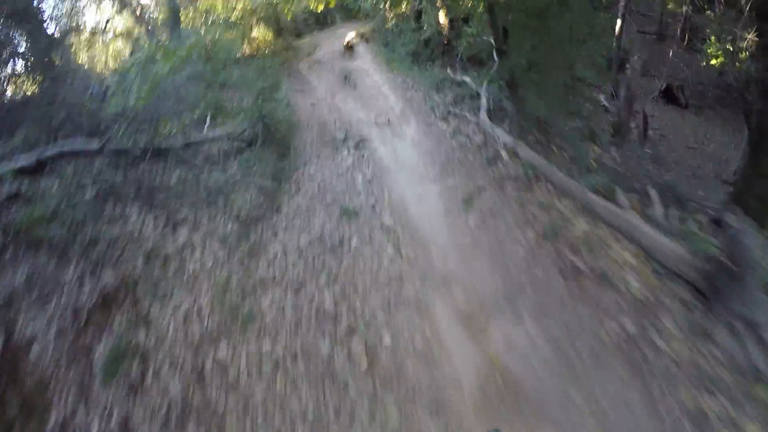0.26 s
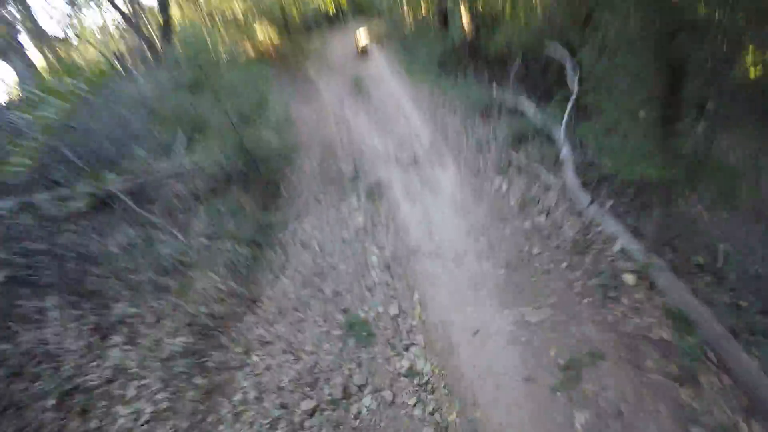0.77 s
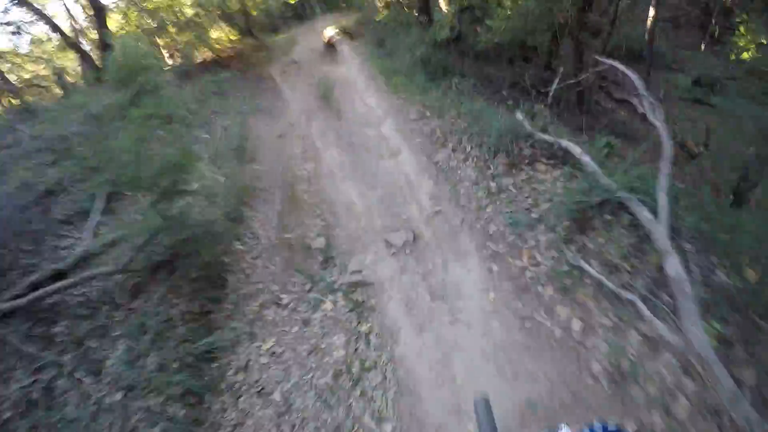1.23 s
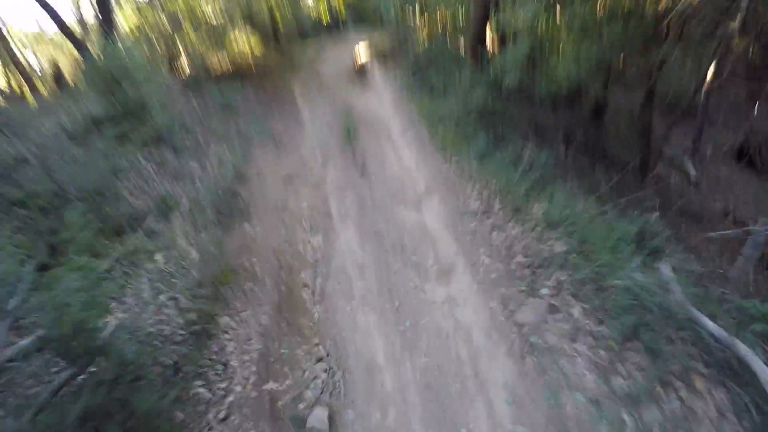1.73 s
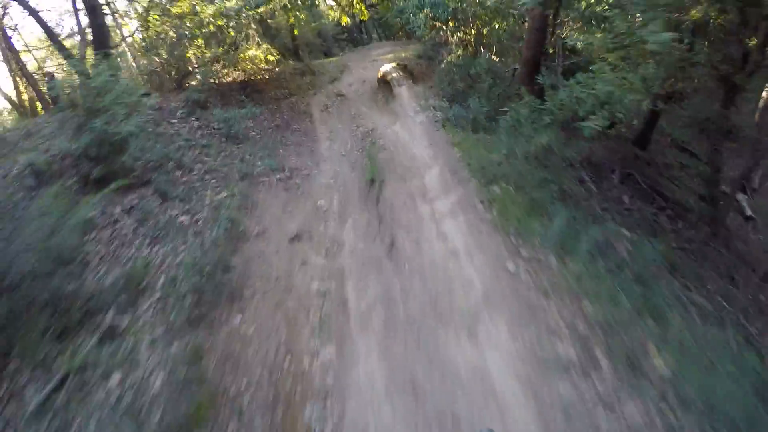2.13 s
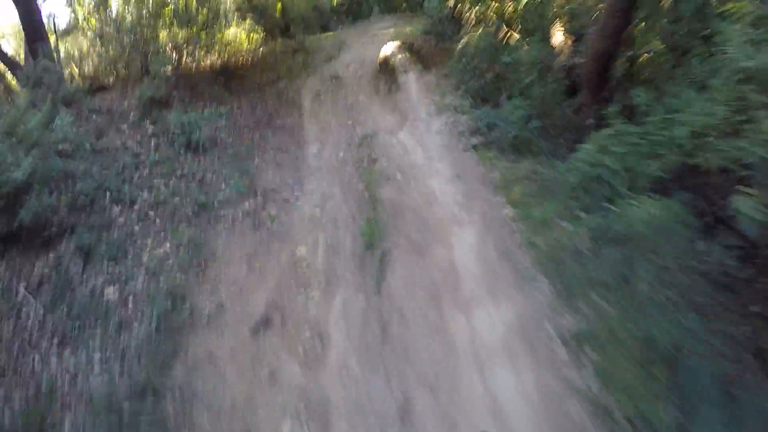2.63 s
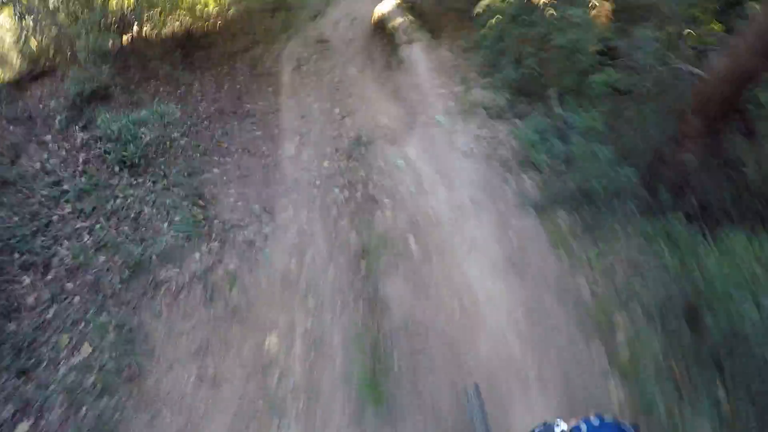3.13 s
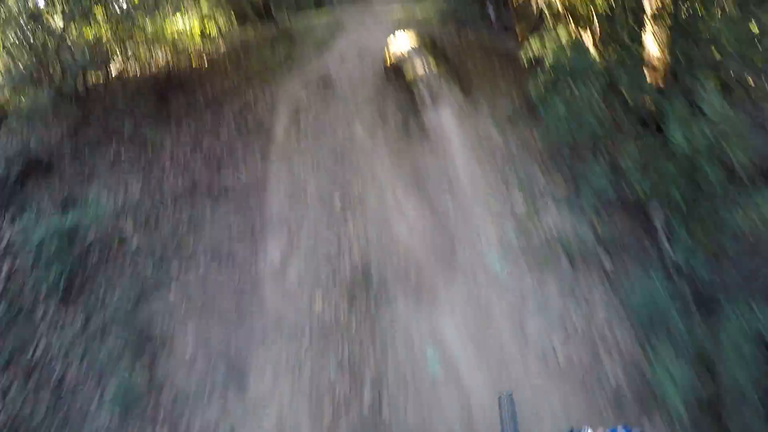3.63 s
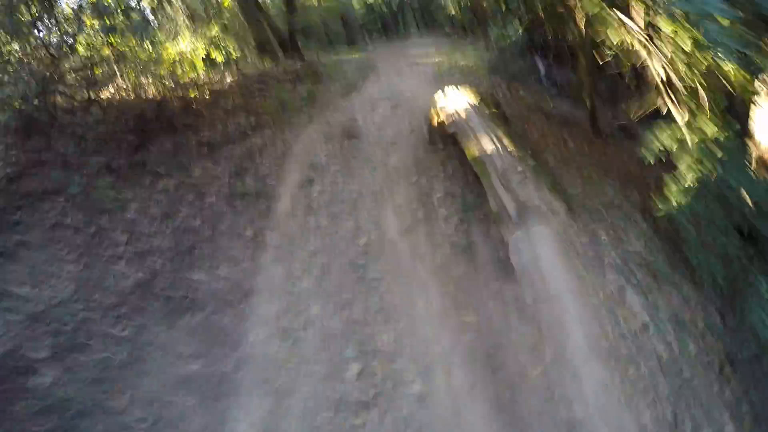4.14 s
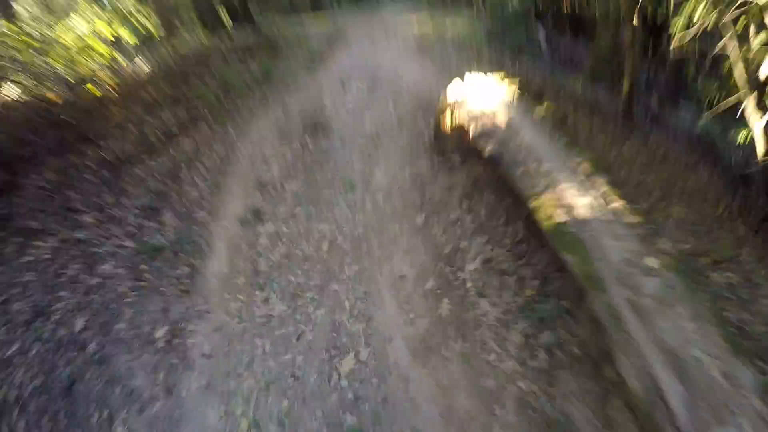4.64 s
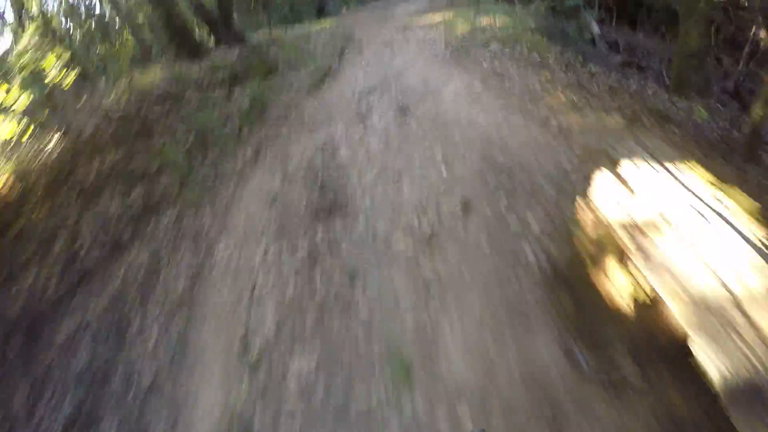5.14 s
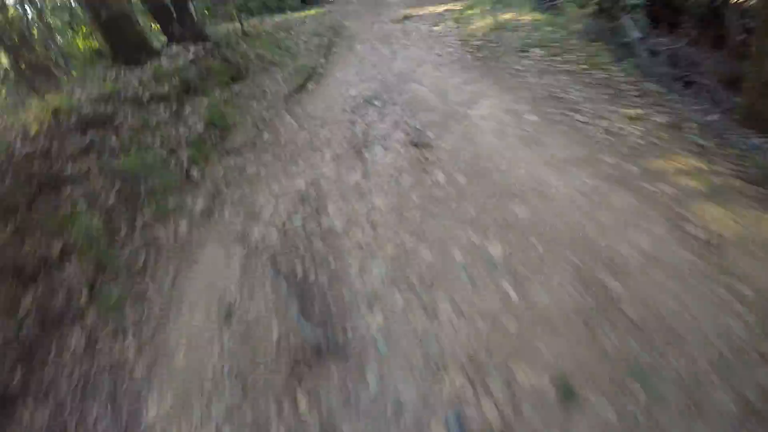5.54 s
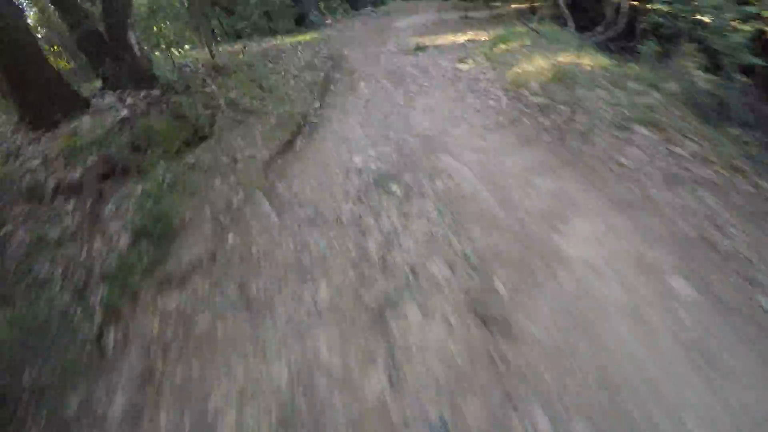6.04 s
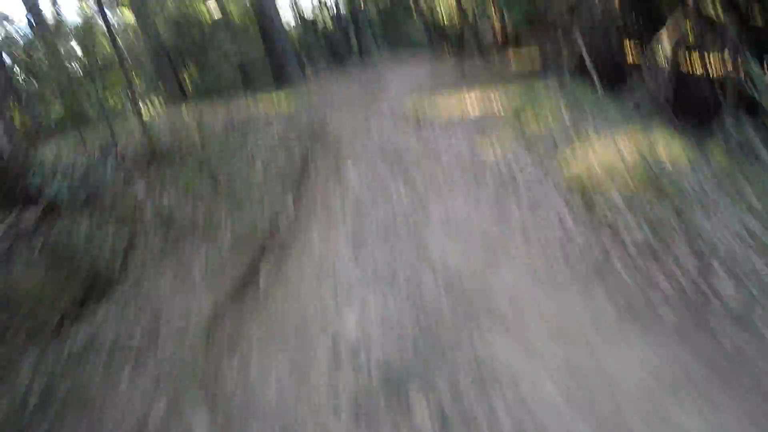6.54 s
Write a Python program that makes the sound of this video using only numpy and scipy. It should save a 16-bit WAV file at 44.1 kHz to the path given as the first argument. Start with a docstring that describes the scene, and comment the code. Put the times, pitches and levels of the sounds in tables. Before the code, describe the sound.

A mountain bike runs fast down a dirt forest trail, captured by a cased camera on the rider. Faint gritty rolling runs throughout, broken by short scuffs of tyres on earth and dry leaves. Chain and cables slap the frame irregularly, with hard clacks near 0.5, 4.2 and 4.4 seconds and a sharp one at 6.7. Low air buffets and tyre drumming pulse underneath. Bumps boom deeply around 1.6 and 2.4 seconds, then near 3.0 and 3.2. Tiny stone ticks come at 2.1 and 2.7. Between about 3.3 and 4.1 it is somewhat calmer, before a strong double jolt and crunch at 4.2. The heaviest, hollow thump lands at 5.1, followed by another at 5.5 amid stronger wind. Further bumps follow at 6.0 and 6.4, and a last loud clatter near 6.7. A thin hiss follows the rumble, with a very faint high electronic whine.

```python
"""A mountain bike runs fast down a dirt forest trail, heard from a camera on the rider. The tyres crunch dirt
and dry leaves; short scuffs surge with crunch and rub: spiky noise, coloured by the camera case. Chain and
cables slap the frame, and two flicked stones tick: short bursts of damped modes. Air buffets and tyres drum as
low noise; bumps boom as decaying sines, and a thin hiss follows the rumble. The camera rocks after each scuff
in slow pulses; its electronics whine in faint sine tones."""
import sys
import numpy as np
from scipy import signal
from scipy.fft import rfft, irfft, next_fast_len
from scipy.io import wavfile
from scipy.ndimage import uniform_filter1d, map_coordinates

SR = 44100
rng = np.random.default_rng(int(sys.argv[2]) if len(sys.argv) > 2 else 0)


def digitize_waveform(pressure):
    """Quantize a signal to 16-bit integers and store it at the path in sys.argv[1].

    Rows of a 2-D input are taken as channels; values are limited to [-1, 1].
    """
    field = np.atleast_2d(pressure).T
    bounded = np.clip(field, -1, 1)
    quanta = np.round(bounded * 32767).astype(np.int16)
    wavfile.write(sys.argv[1], SR, quanta)


N = 299421

# surges of crunch and rub: # (crest time [s], crunch level [dB], half-length [s], drumming level [dB])
SCUFF_EVENTS = [(0.081, -28.5, 0.012, -30.5), (0.175, -34.5, 0.035, -27.5), (0.31, -49, 0.021, -39),
                (0.572, -43.5, 0.052, -31.5), (0.737, -38, 0.013, -31.5), (0.942, -38, 0.014, -34.5),
                (1.051, -38, 0.016, -34.5), (1.187, -36.5, 0.012, -28.5), (1.244, -43.5, 0.022, -38),
                (1.319, -33.5, 0.011, -28.5), (1.377, -37.5, 0.017, -48), (1.582, -41, 0.032, -27.5),
                (1.659, -32.5, 0.015, -36), (1.782, -34, 0.018, -25.5), (1.929, -43, 0.014, -37),
                (2.121, -44.5, 0.028, -40.5), (2.33, -37, 0.0081, -28.5), (2.365, -32, 0.011, -16.5),
                (2.41, -42.5, 0.022, -47), (2.622, -36, 0.017, -28), (2.67, -25.5, 0.013, -22),
                (2.735, -37, 0.017, -44), (2.802, -46.5, 0.017, -50), (2.95, -41, 0.03, -33),
                (2.998, -31.5, 0.012, -32), (3.042, -40, 0.008, -37), (3.087, -43, 0.012, -44),
                (3.166, -31.5, 0.014, -19.5), (3.207, -37, 0.015, -34), (3.319, -38, 0.032, -46),
                (3.424, -37, 0.023, -27), (3.514, -36, 0.018, -38), (3.627, -40, 0.021, -27),
                (3.7, -38.5, 0.012, -32.5), (4.196, -28, 0.013, -19.5), (4.244, -23, 0.012, -21),
                (4.293, -36.5, 0.044, -48), (4.447, -38, 0.06, -37), (4.583, -38, 0.007, -32),
                (4.705, -35, 0.015, -33.5), (4.785, -42, 0.032, -38), (5.004, -34, 0.013, -30.5),
                (5.057, -29, 0.013, -24), (5.106, -33.5, 0.017, -24.5), (5.207, -39.5, 0.015, -38),
                (5.252, -38, 0.0094, -29), (5.453, -36, 0.016, -31.5), (5.508, -25.5, 0.011, -21),
                (5.556, -28.5, 0.014, -23.5), (5.74, -35.5, 0.011, -31), (5.787, -43.5, 0.032, -31.5),
                (5.919, -38, 0.0061, -25), (6.054, -38, 0.012, -27.5), (6.185, -39.5, 0.012, -33.5),
                (6.285, -43, 0.023, -44), (6.368, -33, 0.012, -31), (6.409, -35.5, 0.014, -22.5),
                (6.626, -29, 0.021, -30), (6.675, -23, 0.011, -18.5), (6.716, -35.5, 0.012, -31)]
# chain and cables on the frame: (time [s], level [dB], hollow knock re level [dB])
SLAP_EVENTS = [(0.0568, -16, -23), (0.2688, -26, -22), (0.5145, -10.5, -26.5), (0.619, -17.5, -29),
               (0.694, -25.5, -19.5), (0.922, -27.5, -25), (1.1515, -25, -18.5), (1.272, -18.5, -30),
               (1.378, -29, -24), (1.4177, -29, -19), (1.842, -21.5, -30), (2.1127, -25, -28),
               (2.3052, -22, -29), (2.5438, -33.5, -16.5), (2.6217, -21, -19.5), (2.7436, -21, -34),
               (2.8588, -20, -23), (2.8993, -27, -28), (3.1446, -20, -23), (3.275, -18, -34),
               (3.5022, -20, -34), (3.5955, -25.5, -21), (3.9237, -30, -17.5), (4.041, -22.5, -21),
               (4.1815, -11, -25.5), (4.4207, -14.5, -42), (4.4397, -20.5, -18.5), (4.959, -21, -24.5),
               (5.1065, -14.5, -8.5), (5.3395, -24.5, -26), (5.4864, -24, -28), (5.633, -22, -25),
               (5.7058, -22.5, -21), (5.9, -30, -18), (6.0382, -19.5, -24.5), (6.554, -23, -23.5),
               (6.622, -15.5, -22), (6.6761, -7, -32)]
# crunch as it sounds through the case: (frequency [Hz], density [dB per Hz])
CRUNCH_SPECTRUM = [(200, -14), (340, -24.5), (420, -9.5), (490, -14), (560, -17), (620, -13.5), (860, -17),
                   (1200, 0), (2000, -2), (3500, -9.5), (4400, -14), (4800, -16.5), (5700, -19.5),
                   (6500, -32.5), (9500, -31.5), (15500, -40.5)]


def amp(db):
    """Decibels to gain."""
    return 10 ** (np.asarray(db) / 20)


def unit(x):
    """Scale to rms 1."""
    return x / np.sqrt(np.mean(x ** 2) + 1e-20)


def along(points, hz):
    """Interpolate (Hz, value) points on a log frequency axis."""
    f, v = np.transpose(points)
    return np.interp(np.log(hz + 1), np.log(f + 1), v)


def curves(rows):
    """One value per sample for each column after the time."""
    s, *cols = np.transpose(rows)
    return [np.interp(np.arange(N) / SR, s, c) for c in cols]


def wobble(rate):
    """A smooth random curve, rate knots a second."""
    knots = rng.standard_normal(N // 20)
    return map_coordinates(knots, [np.arange(N) * rate / SR], mode="wrap")


def swells(rows):
    """Gain of bell-shaped swells (s, dB, half-length s), summed in power."""
    t = np.arange(N) / SR
    power = sum(amp(2 * db) * np.exp(-((t - s) / length) ** 2) for s, db, length in rows)
    return np.sqrt(power + 1e-20)


def filtered(x, response):
    """x times a response of frequency."""
    m = next_fast_len(N + SR // 2)
    return irfft(rfft(x, m) * response(np.fft.rfftfreq(m, 1 / SR)), m)[:N]


def coloured(x, gain_db):
    """Causal minimum-phase colouring by a dB function of frequency, at rms 1."""
    size = 8192
    cepstrum = irfft(np.log(amp(gain_db(np.fft.rfftfreq(size, 1 / SR)))))
    # fold the cepstrum onto positive time
    cepstrum[1:size // 2] *= 2
    cepstrum[size // 2 + 1:] = 0
    impulse = irfft(np.exp(rfft(cepstrum)))
    return unit(signal.fftconvolve(x, impulse)[:N])


def rumble(spectrum, steady_s):
    """Low noise whose rms stays near 1 over spans of steady_s."""
    x = filtered(rng.standard_normal(N), lambda hz: amp(along(spectrum, hz)))
    envelope = np.abs(signal.hilbert(x))
    power = uniform_filter1d(envelope ** 2, max(int(steady_s * SR), 1)) / 2
    return x / np.sqrt(np.abs(power) + 1e-20)


def ring(modes, t, attack_s):
    """Damped modes (Hz, dB, t60 s) at new strengths for each blow, peak 1."""
    hz, db, t60_s = np.transpose(modes)[:, :, None]
    size, detune, phase = rng.standard_normal((3, len(modes), 1))
    swing = amp(1.5 * size) * np.sin(2 * np.pi * hz * (1 + 0.012 * detune) * t + 1.2 * phase)
    attack = 1 - np.exp(-(t / attack_s) ** 2)
    x = (amp(db - 60 * t / t60_s) * swing).sum(0) * attack
    return x / np.abs(x).max()


def add(track, s, x):
    """Mix x into the track at time s."""
    part = track[max(round(s * SR), 0):][:len(x)]
    part += x[:len(part)]


def grit(spread_db):
    """White noise with a random level at every sample: thousands of tiny uneven snaps."""
    return rng.standard_normal(N) * amp(spread_db * rng.standard_normal(N))


def crunch():
    """Grit and leaves break in thousands of tiny snaps; surges of crunch and rub come at every scuff."""
    # steady rolling over dirt: (time [s], level [dB])
    rolling_levels = [(0, -44), (0.33, -47.5), (0.68, -53.5), (0.83, -43.5), (1.0, -54), (1.6, -50.5),
                      (1.88, -53), (2.2, -54), (2.55, -56), (3.05, -49.5), (3.4, -50.5), (4.1, -53.5),
                      (4.35, -43.5), (4.87, -53.5), (5.35, -50), (5.65, -46.5), (5.95, -49.5),
                      (6.79, -50.5)]
    # narrow resonances of the case: (frequency [Hz], width [Hz], gain [dB])
    case_resonances = [(1225, 30, 2), (1812, 12, -16), (1925, 100, 0.5), (2417, 46, -21.5), (2515, 190, 3),
                       (2850, 138, 6.5), (4188, 92, 9), (7300, 1860, 10), (11400, 900, 4.5)]
    light_tilt = [(300, 5.4), (900, 1.9), (4000, 1.2), (5700, 2.2), (8000, 0.54), (15000, 4)]
    crackle_spectrum = [(2000, -33), (4200, 2.5), (5300, -3.0), (6500, -10), (7500, 6.0),
                        (8300, 7), (9300, -23), (11500, -7.0), (15000, -23)]
    uneven_db, uneven_rate_hz = 2, 16

    def case_db(hz):
        peaks = sum(db / (1 + (2 * (hz - f) / width) ** 2) for f, width, db in case_resonances)
        return along(CRUNCH_SPECTRUM, hz) + peaks

    # light rolling is duller than a scuff
    light = coloured(grit(spread_db=6.5), lambda hz: case_db(hz) + along(light_tilt, hz))
    rolling = amp(curves(rolling_levels)[0] + uneven_db * wobble(rate=uneven_rate_hz)) * light

    surge = swells([row[:3] for row in SCUFF_EVENTS])
    scuffing = amp(-0.02) * surge * coloured(grit(spread_db=6), case_db)

    # the hardest scuffs add a sharp crackle
    sharp = coloured(grit(spread_db=6.0), lambda hz: along(crackle_spectrum, hz))
    hardness = (surge / surge.max()) ** 0.28
    crackle = amp(-17.5) * surge * hardness * sharp * amp(3.9 * wobble(rate=34))
    return (rolling + scuffing + crackle) * amp(1.6 * wobble(rate=130))


def buffeting():
    """Air on the microphone: low noise, an uneven steady flow plus gusts."""
    # crests: (time [s], level [dB], half-length [s])
    gusts = [(.07, -14, 0.071), (.5, -14.5, 0.032), (.66, -18, 0.022), (1.07, -26, 0.05),
             (1.32, -11.5, 0.048), (1.62, -10, 0.019), (1.75, -15.5, 0.027), (2.13, -20.5, 0.096),
             (2.37, -9, 0.027), (2.66, -6.5, 0.027), (2.98, -13.5, 0.053), (3.19, -12, 0.023),
             (3.84, -21, 0.035), (4.25, -5, 0.043), (4.58, -15.5, 0.065), (4.74, -18, 0.03),
             (5.04, -12, 0.061), (5.53, -10.5, 0.044), (5.79, -23, 0.036), (6.05, -14.5, 0.058),
             (6.24, -18, 0.055), (6.39, -11.5, 0.057), (6.68, -11, 0.037)]
    # steady flow: (time [s], level [dB])
    airflow = [(0, -27.5), (0.8, -25), (1.9, -30.5), (3.4, -30), (4.1, -31), (4.8, -37.5), (5.4, -17),
               (5.9, -27), (6.79, -30.5)]
    # (frequency [Hz], density [dB per Hz])
    buffet_spectrum = [(8, -17.5), (16, 8.5), (26, -0.5), (45, -6.5), (68, -18.5), (95, -25), (200, -54),
                       (400, -85)]
    flow = amp(curves(airflow)[0] + 4.5 * wobble(rate=18))
    return np.hypot(flow, swells(gusts)) * rumble(buffet_spectrum, steady_s=0.11)


def drumming():
    """Tyres drum as low noise that swells under each scuff; the bike shudders after each slap."""
    # (frequency [Hz], density [dB per Hz])
    drum_spectrum = [(45, -17), (75, -5.5), (120, 4.5), (135, -3), (155, -16.5), (205, -33.5), (250, -38),
                     (330, -51), (700, -67.5)]
    lag_s, floor_db = 0.007, -46.5  # lag behind the crunch; level on smooth ground
    shudder_db, shudder_lag_s, shudder_s = 9.5, 0.011, 0.0089  # re knock; delay; half-length
    loads = [(s + lag_s, db, 1.1 * length) for s, _, length, db in SCUFF_EVENTS]
    shudders = [(s + shudder_lag_s, db + knock_db + shudder_db, shudder_s)
                for s, db, knock_db in SLAP_EVENTS]
    level = np.hypot(amp(floor_db), swells(loads + shudders)) * amp(2.8 * wobble(rate=25))
    return level * rumble(drum_spectrum, steady_s=0.03)


def fizz(shake):
    """A thin hiss that swells with each swing of the rumble."""
    hiss_spectrum = [(300, 11), (4000, 2), (15000, -2.0)]
    hiss = coloured(rng.standard_normal(N), lambda hz: along(hiss_spectrum, hz))
    swing = filtered(shake, lambda hz: 1 / (1 + (hz / 70) ** 4))
    return amp(-38.5) * (np.abs(swing) + amp(-36)) * hiss


def whine():
    """Faint high tones of the camera's electronics: one steady, one beating."""
    t = np.arange(N) / SR
    steady, high, beat = [np.sin(2 * np.pi * hz * t) for hz in (8000, 14176, 30)]
    beating = high * (1 + 1.1 * beat + 0.24 * wobble(rate=25))
    return amp(-80) * steady + amp(-75.5) * beating


def slaps():
    """Each slap rings damped frame modes, knocks the hollow case and chatters briefly as noise."""
    # frame modes: (frequency [Hz], level [dB], t60 [s])
    frame_modes = [(997, -2.5, 0.015), (1201, -1, 0.024), (1340, -3.5, 0.031), (1507, 2.5, 0.019),
                   (1728, -2, 0.026), (1977, -6.5, 0.04), (2220, -8, 0.026), (2670, -15, 0.052),
                   (3235, -15.5, 0.043), (4090, -25.5, 0.053), (4370, -17, 0.024), (5640, -28, 0.013)]
    # hollow tones of the camera case: (frequency [Hz], level [dB], t60 [s])
    case_modes = [(227, -9, 0.041), (432.5, -3, 0.08), (470, -8.5, 0.044), (605, -1.5, 0.037),
                  (787, -10, 0.02)]
    out, chatter, t = np.zeros(N), np.zeros(N), np.arange(SR // 10) / SR
    for s, db, knock_db in SLAP_EVENTS:
        add(out, s, amp(db - 4.0) * ring(frame_modes, t, attack_s=0.00078))
        # the next link lands
        add(out, s + 0.00258, amp(db - 19) * ring(frame_modes, t, attack_s=0.0023))
        add(out, s, amp(db + knock_db + 8.0) * ring(case_modes, t, attack_s=0.0003))
        add(chatter, s, amp(db - 24.5 - 60 * t / 0.079))
    noise = coloured(rng.standard_normal(N), lambda hz: along(CRUNCH_SPECTRUM, hz))
    return out + chatter * noise


def rocking():
    """After each scuff the camera rocks on its mount: one soft push, alternately up and down."""
    lag_s, push_s = 0.0282, 0.0068
    db_per_scuff_db, full_scale_db = 0.68, 7
    out, t = np.zeros(N), np.arange(SR // 6) / SR
    u = t / push_s
    push = u ** 2 * (1 - u / 3) * np.exp(-u)
    push = push / push.max()
    for k, (s, db, *_) in enumerate(SCUFF_EVENTS):
        gain = amp(db_per_scuff_db * db + full_scale_db)
        add(out, s + lag_s, (-1) ** k * gain * push)
    return out


def jolts():
    """Hard bumps swing the camera: a decaying sine boom with a dull thud of low noise."""
    # (time [s], boom level [dB], boom pitch [Hz], thud level [dB])
    bumps = [(1.603, -4, 62.6, -35), (2.117, -34, 60, -35), (2.14, -42, 60.4, -42), (2.36, -5, 72.4, -30),
             (2.662, -11, 80, -39), (2.96, -5, 58.6, -36), (3.152, -7, 82, -39), (4.183, -3, 79.5, -41),
             (4.237, -3.5, 77, -42), (4.485, -14.5, 100, -41), (5.107, 2, 59.6, -17.5),
             (5.497, -1, 59, -33), (6.02, -14, 66, -46), (6.414, -10.5, 74, -40), (6.674, -1.5, 75, -31)]
    # (frequency [Hz], density [dB per Hz])
    thud_spectrum = [(80, -1), (170, 5), (250, -3), (330, -17), (400, -3.5), (480, -7), (600, -13),
                     (900, -20), (2000, -63)]
    boom_t60_s, thud_t60_s = 0.094, 0.07
    boom, thud, t = np.zeros(N), np.zeros(N), np.arange(SR // 5) / SR
    rise = 1 - np.exp(-t / 0.0037)
    for s, db, hz, thud_db in bumps:
        add(boom, s, amp(db - 60 * t / boom_t60_s) * np.sin(2 * np.pi * hz * t) * rise)
        add(thud, s, amp(thud_db - 60 * t / thud_t60_s) * rise)
    return boom + thud * rumble(thud_spectrum, steady_s=0.027)


def stones():
    """Small stones flicked by the tyres tick as high damped modes."""
    # (time [s], peak level [dB])
    stone_ticks = [(2.114, -31), (2.747, -31)]
    # (frequency [Hz], level [dB], t60 [s])
    stone_modes = [(2780, 3, .02), (4120, -1, .025), (5520, -2, 0.02), (5720, -6, .02), (7960, -17, 0.013)]
    out, t = np.zeros(N), np.arange(SR // 10) / SR
    for s, db in stone_ticks:
        add(out, s, amp(db) * ring(stone_modes, t, attack_s=0.0005))
    return out


def scene():
    """Everything at the one microphone."""
    shake = buffeting() + drumming() + rocking() + jolts()
    return (crunch() + shake + fizz(shake) + whine() + slaps() + stones())[None]


def record(dry):
    """The camera rounds off the highest peaks and keeps nothing above its band limit."""
    ceiling, top_hz = 0.95, 15550
    rounded = dry[0] / (1 + np.abs(dry[0] / ceiling) ** 6) ** (1 / 6)
    return filtered(rounded, lambda hz: hz < top_hz)[None]


dry = scene()
out = record(dry)
digitize_waveform(out)
```